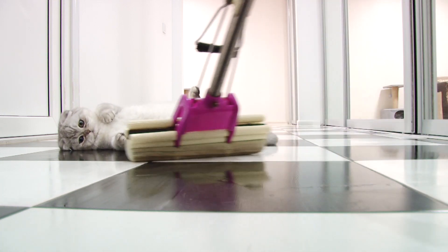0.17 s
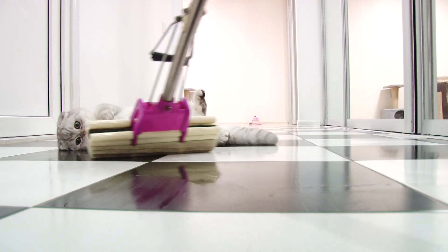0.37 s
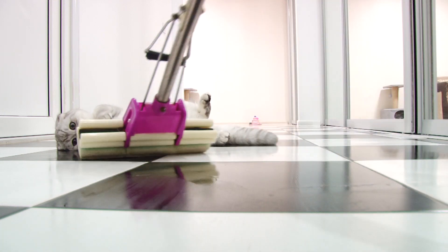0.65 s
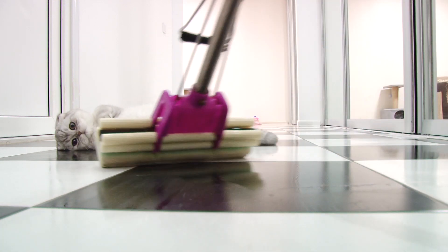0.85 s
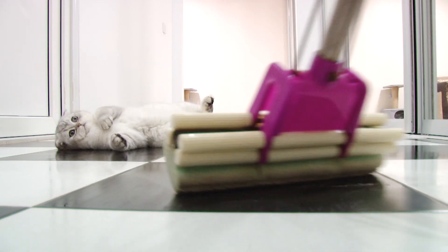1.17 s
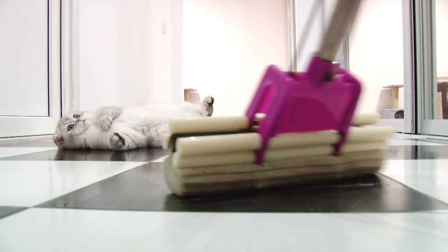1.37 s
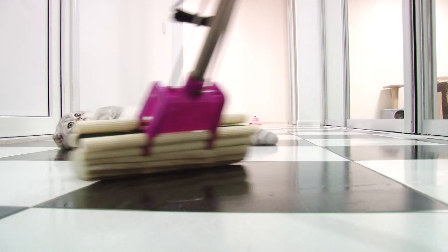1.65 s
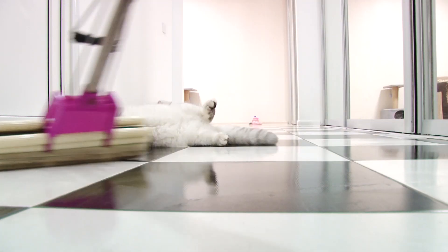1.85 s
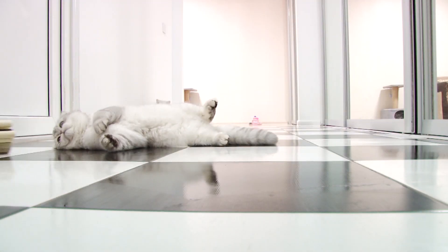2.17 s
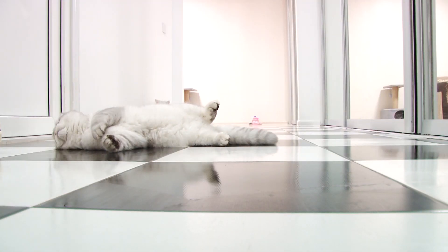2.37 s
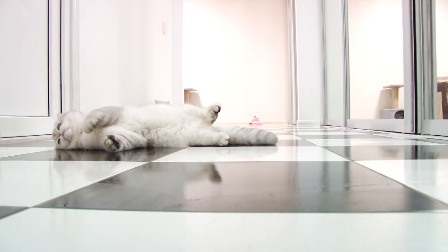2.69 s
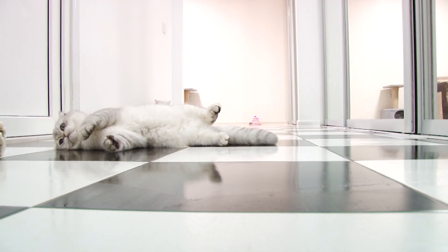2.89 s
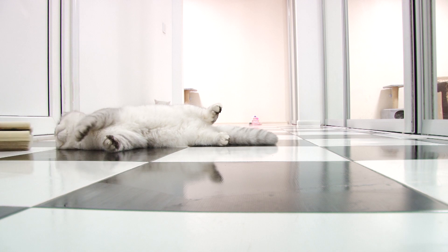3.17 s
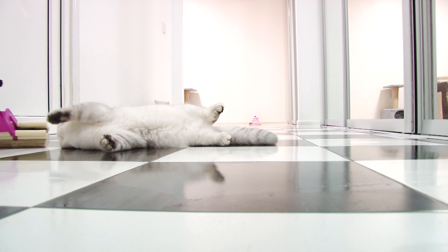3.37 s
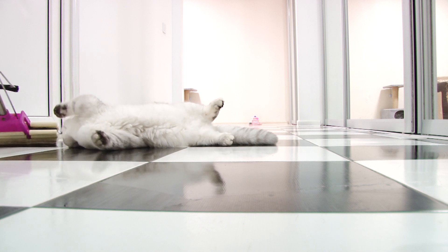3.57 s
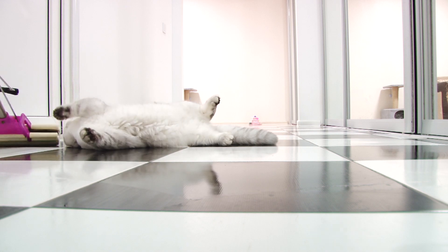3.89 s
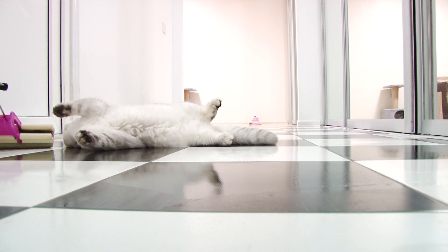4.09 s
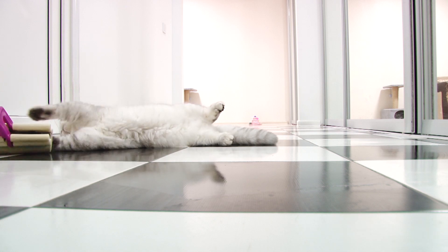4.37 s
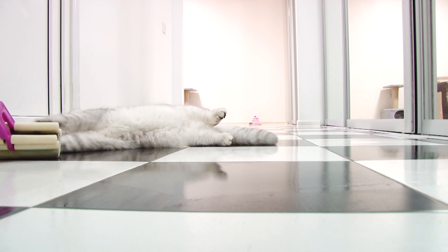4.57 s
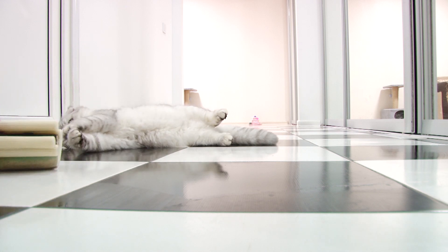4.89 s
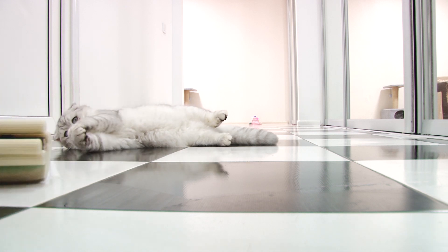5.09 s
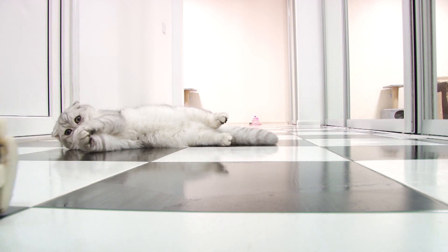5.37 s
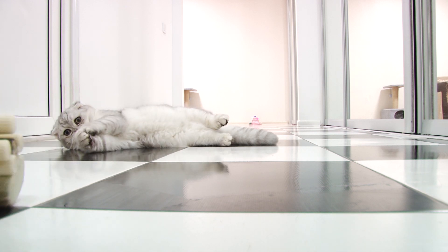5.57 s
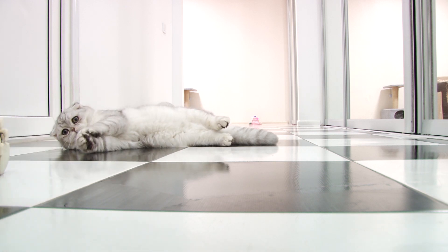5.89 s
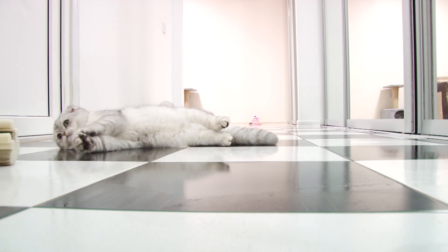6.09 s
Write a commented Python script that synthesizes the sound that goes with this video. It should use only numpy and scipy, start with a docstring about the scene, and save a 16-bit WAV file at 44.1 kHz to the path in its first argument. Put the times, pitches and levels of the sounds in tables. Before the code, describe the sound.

A low, close microphone catches a sponge mop pushed over tile. Fine wet hissing dips briefly before most clacks of the hinged plastic head, which catches, slams, rattles and rebounds with a short bright room echo. Between strokes come little clicks, soft scuffs and a barely audible rubbery groan; near the end the sponge peels with crisp ticks. A quiet hum and low rumble continue throughout.

```python
"""A wet sponge mop is pushed back and forth over a tiled floor, close by in a hard-walled room.
The damp sponge is coloured noise that fizzes as it slides and briefly goes quiet and dull now and then.
After most of these dips the loose plastic head catches, slams over, rattles and rebounds: modes plus noise.
One stroke adds a resonant swish; sponge and hinge tick and peel, and rubber groans in faint low tones.
Feet scuff softly in noise bands, and an appliance hums on a few sines over a low rumble."""
import sys
import numpy as np
from scipy import signal
from scipy.fft import rfft, irfft, next_fast_len
from scipy.io import wavfile

SR = 44100
rng = np.random.default_rng(int(sys.argv[2]) if len(sys.argv) > 2 else 0)


def put_to_file(sound):
    """Save the sound as 16-bit audio at rate SR, in the file named by the first command-line argument."""
    columns = np.atleast_2d(sound).T  # one column per channel
    safe = np.clip(columns, -1, 1)
    whole_steps = np.round(safe * 32767)
    wavfile.write(sys.argv[1], SR, whole_steps.astype(np.int16))


N = 275095
TIME = np.arange(N) / SR
TOP_HZ = 15800  # upper limit of the sound

# crack of hard plastic, shared by head and ticks: (f/Hz, level/dB)
CRACK_COLOUR = [(200, -9), (1000, -22), (2000, 1.5), (2800, 10.5), (3600, 0.5), (4300, 5), (5200, -1),
                (6700, 2), (7700, -3.5), (8500, -2.5), (10000, -16), (15500, -40)]


def sponge(grain_db=4.0, pivot_hz=5000, flicker_db=1.5, judder_db=0.72):
    """Countless wet pores let go of the tile; the fizz briefly goes quiet and dull, mostly before a clack."""
    # the slide, as hard as the sponge is pressed: (t/s, level/dB, brightness/dB per octave)
    slide = [(0, -43.5, -1.5), (.18, -41.5, -1.5), (.3, -45.5, -1), (.85, -45, -0.5), (1.1, -44, -2),
             (1.55, -42.5, -4.5), (1.85, -46, 0), (2.1, -47, -0.5), (2.32, -43, 0), (2.8, -45.5, -2),
             (3.3, -47.5, -1.5), (3.75, -45.5, -2.5), (4.2, -48.5, -3), (4.65, -44.5, 0.5),
             (5, -46.5, -1.5), (5.3, -43.5, -0.5), (5.8, -44.5, -2), (6.24, -42, 0.5)]
    # hiss of sponge on tile: (f/Hz, level/dB)
    hiss = [(300, -9.5), (1200, -7), (1800, -6.5), (2400, -1), (3100, -0.5), (3600, -7), (4300, 0.5),
            (5100, -4), (6400, 1.5), (7700, -2), (8500, -2), (9600, -6.5), (12500, -11.5), (15500, -25.5)]
    # short quiet dips of the fizz: (t/s, depth/dB, half width/s)
    dips = [(.61, 7, 0.067), (1.398, 8, 0.032), (2.52, 11.5, 0.12), (2.89, 9, 0.037), (3.85, 4, 0.069),
            (5.572, 7.5, 0.038)]
    dulling = .3  # dB per octave lost per dB of dip
    steepness = 1.9  # squareness of the dip
    s, *columns = np.transpose(slide)
    db, bright = (np.interp(TIME, s, c) for c in columns)
    dip = sum(depth * np.exp(-np.abs((TIME - at) / width) ** steepness) for at, depth, width in dips)
    db = db - dip
    bright = bright - dulling * dip
    fizz = unit(colour(grains(grain_db), hiss))
    out = np.zeros(N)
    for hz, band in bands(fizz):
        octaves = np.clip(np.log2(hz / pivot_hz), -2, 2)
        out += band * undb(bright * octaves + flicker_db * walk(25))
    return out * undb(db + judder_db * walk(40))


def swish(grain_db=4, judder_db=1.5):
    """Water and air are squeezed out under the flat sponge in a dense fizz with a few sharp resonances."""
    # resonances of the swish: (f/Hz, width/Hz, level/dB)
    peaks = [(4210, 640, 5), (5600, 770, 3), (6180, 590, 3), (7200, 1200, 5), (8500, 640, 0.5),
             (10330, 1800, 0), (14000, 4000, -18)]
    start_s, end_s, attack_s, release_s = 0.95, 1.387, .006, 0.033
    steady_db, bite_db, ease_s = -40, 8, 0.1  # it bites, then eases off to a steady push
    fizz = np.zeros(N)
    for hz, width, db in peaks:
        fizz += undb(db) * band_pass(grains(grain_db), [hz - width / 2, hz + width / 2])
    pressed = np.clip(np.minimum((TIME - start_s) / attack_s, (end_s - TIME) / release_s), 0, 1)
    bite = np.exp(-((TIME - start_s) / ease_s) ** 2)
    return unit(fizz) * pressed * undb(steady_db + bite_db * bite + judder_db * walk(89.2))


def knocks(count=5):
    """The hinge catches, the head slams, rattles count times, rebounds and drops; returns direct and room send."""
    # one clack of the mop head per row: (main blow t/s, level/dB, hard edge/dB, near end f/Hz, far end f/Hz,
    #   floor thud/dB, room send/dB, catches before it, their lead/s, first catch/dB, rattle/dB,
    #   rebound after/s, rebound/dB, drop back after/s, drop/dB); edge and room send are relative to the blow
    clack_rows = [(.659, -26.5, -32, 967, 1525, -50, -3.5, 1, 0.0047, -25, -34, .0145, -24.5, 0.035, -32),
                  (1.4396, -13.5, 0.5, 617, 1030, -26, -6.5, 2, 0.012, -34.5, -24.5, .0217, -25.5, .0717, -21),
                  (2.936, -13, -2.5, 1727, 599, -49, -3.5, 2, .0153, -30.5, -26, .0372, -28.5, .076, -23.5),
                  (3.903, -35.5, -15, 610, 1820, -50, 2, 1, 0.0038, -24.5, -39.5, .021, -38.5, 0.047, -53),
                  (5.617, -13.5, -1, 1338, 477, -40, -7, 3, .019, -27.5, -25, .0255, -26.5, 0.082, -31)]
    thump_db = 2
    # the far end of the head lands just after the near end
    rock_s, rock_db, rock_thump_db = .0018, -0.5, -3
    # catches crowd together and move towards the level of the blow, in thin clicks
    catch_hz, catch_crowding, catch_growth, catch_edge_db, catch_thump_db = 1294, 1.45, 1, 1, -24.5
    # a different loose part is struck at each rattle
    rattle_hz, rattle_spread_octaves, rattle_gap_s, rattle_jitter = 1486, 0.373, .0075, .25
    rattle_fall_db_per_s, rattle_edge_db, rattle_thump_db = 98, -11, -3.5
    rebound_hz, rebound_edge_db, rebound_thump_db = 648, 6.5, 1.5
    # the head drops back onto its sponge
    drop_hz, drop_edge_db, drop_thump_db = 980, -16, -0.5

    direct, sent = np.zeros(N), np.zeros(N)
    for (s, db, edge_db, near_hz, far_hz, floor_db, room_db, catches, lead, catch_db, rattle_db,
         rebound, rebound_db, drop, drop_db) in clack_rows:
        clack = np.zeros(N)
        for ahead in np.linspace(1, 0, round(catches), endpoint=False) ** catch_crowding:
            level = db + (catch_db - db) * ahead ** catch_growth
            add(clack, s - lead * ahead, contact(level, catch_thump_db, catch_hz, edge_db + catch_edge_db))
        add(clack, s, contact(db, thump_db, near_hz, edge_db))
        add(clack, s, undb(floor_db) * thud())
        add(clack, s + rock_s, contact(db + rock_db, rock_thump_db, far_hz, edge_db))
        for k, (late, part) in enumerate(rng.standard_normal((count, 2)), 1):
            after = rattle_gap_s * (k + rattle_jitter * late)
            hz = rattle_hz * 2 ** (rattle_spread_octaves * part)
            level = rattle_db - rattle_fall_db_per_s * after
            add(clack, s + after, contact(level, rattle_thump_db, hz, edge_db + rattle_edge_db))
        add(clack, s + rebound,
            contact(rebound_db, rebound_thump_db, rebound_hz, edge_db + rebound_edge_db))
        add(clack, s + drop, contact(drop_db, drop_thump_db, drop_hz, edge_db + drop_edge_db))
        direct += clack
        sent += undb(room_db) * clack
    return direct, sent


def contact(db, thump_db, thump_hz, edge_db, crack_t60=0.012, rattle_db=-18, rattle_t60=0.075,
            thump_t60=0.04, clatter_db=-6.0, clatter_t60=0.038, clatter_hz=(520, 2000), detune=0.0067,
            scatter_db=1.6, head_cut_hz=230, focus_db=8, focus_width=0.017):
    """One contact thumps the struck part, rings the head and cracks the plastic."""
    # what head and handle ring with: (f/Hz, t60/s, energy/dB)
    head_modes = [(246, 0.03, -18), (400, 0.099, -8.5), (483.4, 0.062, -3), (655, 0.023, -3),
                  (730, 0.013, -51), (910, 0.016, -40), (1186, 0.088, -4), (1329.5, 0.055, 3),
                  (1500, 0.019, -3), (1569, 0.065, 3.5), (1720, 0.01, 1), (1772, 0.017, 4.5),
                  (1968, 0.043, -13), (2290, 0.021, -4.5), (2604, 0.021, -4.5), (2940, 0.09, -10),
                  (3031, 0.043, -5), (1774, 0.57, -13.5), (1670, .4, -7)]
    t = np.arange(SR // 2) / SR
    hz, t60, mode_db = np.transpose(head_modes)
    # every contact lands on another spot, so the modes differ in pitch, strength and sign
    pitch, strength, side = rng.standard_normal((3, len(hz)))
    # modes close to the pitch of the struck part take up more of the blow
    near = np.exp(-(np.log(hz / thump_hz) / focus_width) ** 2)
    gain = np.sign(side) * undb(mode_db + scatter_db * strength + focus_db * near) / np.sqrt(t60)
    mode_hz = hz * (1 + detune * pitch)
    ring = gain @ (np.sin(2 * np.pi * mode_hz[:, None] * t) * fade(t, t60[:, None]))
    # the part that is struck gives a short damped thump of its own
    thump = low_cut(np.sin(2 * np.pi * thump_hz * t) * fade(t, thump_t60), thump_hz / 2)
    # rollers and rods add a crowd of modes too dense to tell apart
    clatter = band_pass(rng.standard_normal(len(t)), clatter_hz) * fade(t, clatter_t60)
    # the crack is over at once; loose parts buzz on a little
    crack_fade = fade(t, crack_t60) + undb(rattle_db) * fade(t, rattle_t60)
    crack = colour(rng.standard_normal(len(t)) * crack_fade, CRACK_COLOUR)
    blow = burst(ring) + undb(thump_db) * burst(thump)
    blow += undb(clatter_db) * burst(clatter) + undb(edge_db) * burst(crack)
    return low_cut(undb(db) * blow, head_cut_hz)


def thud(hz=238, t60=0.055):
    """The floor gives a low, quickly damped note under the blow."""
    t = np.arange(SR // 4) / SR
    return burst(low_cut(np.sin(2 * np.pi * hz * t) * fade(t, t60), hz / 2))


def ticks(snap_db=-8, snap_t60=0.005, crackle_db=-20, crackle_t60=0.17, crackle_hz=(1600, 3600)):
    """Tiny pops of a few cycles, each with a snap at its start and a short crackle after it."""
    # the clearest ticks of sponge and hinge: (t/s, peak level/dB, f/Hz)
    tick_rows = [(1.007, -23.5, 2400), (2.6125, -24, 1280), (2.7454, -16, 5240), (3.944, -17.5, 5570),
                 (4.59, -17.5, 3220), (5.006, -26.5, 2300), (5.061, -26, 3060), (5.085, -23, 2980),
                 (5.1254, -11.5, 2550), (5.162, -25, 3300), (5.216, -24, 3000), (5.23, -27, 5400),
                 (5.2361, -14.5, 2420), (5.251, -20.5, 2720), (5.331, -23.5, 3220), (5.375, -12, 4660),
                 (5.394, -23, 5260), (5.401, -14.5, 2460), (6.1244, -21.5, 2330), (6.1839, -15, 3170)]
    decay_cycles = 14.2  # a pop falls by 60 dB within this many cycles
    out, t = np.zeros(N), np.arange(SR // 10) / SR
    for s, db, hz in tick_rows:
        snap = colour(rng.standard_normal(len(t)) * fade(t, snap_t60), CRACK_COLOUR)
        # cubed noise is sparse and spiky
        crackle = band_pass(rng.standard_normal(len(t)) ** 3, crackle_hz) * fade(t, crackle_t60)
        # the pop swells over half a cycle
        pop = np.sin(2 * np.pi * hz * t) * np.minimum(2 * hz * t, 1) * fade(t, decay_cycles / hz)
        tick = low_cut(pop, hz / 2)
        tick += undb(snap_db) * snap / np.abs(snap).max()
        tick += undb(crackle_db) * crackle / np.abs(crackle).max()
        add(out, s, undb(db) * tick)
    return out


def peel(rate=160, size_db=6, band_hz=(1900, 4200)):
    """Single wet pores pop at random as the sponge peels off the tile, a few much louder than the rest."""
    peak_s, level_db, rise_db_per_s, fall_db_per_s = 5.06, -52, 203, 47  # a quick swell, then a steady fall
    sizes = undb(size_db * np.minimum(rng.exponential(size=N), 2))
    pores = (rng.random(N) < rate / SR) * sizes
    drop_db = np.maximum(rise_db_per_s * (peak_s - TIME), fall_db_per_s * (TIME - peak_s))
    return unit(band_pass(pores, band_hz)) * undb(level_db - drop_db)


def groan(waver=0.0063, rough_db=2):
    """Rubber sticks and slips briefly, holding a few low tones that waver in pitch and level."""
    # faint tones of rubbing rubber: (start/s, end/s, f/Hz, level/dB)
    groan_rows = [(2.645, 2.77, 125, -50), (2.62, 2.86, 500, -52), (2.75, 2.815, 265, -48)]
    out = np.zeros(N)
    for start, end, hz, db in groan_rows:
        cycles = np.cumsum(hz * (1 + waver * walk(34))) / SR
        tone = np.sqrt(2) * np.sin(2 * np.pi * cycles) * undb(db + rough_db * walk(37))
        length = max(int((end - start) * SR), 2)
        add(out, start, tone[:length] * signal.windows.tukey(length, .5))
    return out


def shuffles(width=0.65):
    """Rubbing feet and sponge give scuffs of band noise that swell and die away."""
    # soft scuffs of feet and sponge: (t/s, level/dB, f/Hz, length/s); each peaks at half its length
    scuff_rows = [(0.22, -37, 4480, 0.012), (1.189, -54, 230, 0.25), (1.361, -48, 218, 0.06),
                  (1.899, -55.5, 520, 0.26), (2.296, -49.5, 2480, 0.093), (2.536, -42.5, 790, 0.026),
                  (2.558, -49.5, 380, 0.083), (2.559, -47.5, 945, 0.16), (3.634, -46, 660, 0.042),
                  (3.68, -49.5, 192, 0.13), (4.32, -47, 2380, 0.047), (4.745, -48.5, 864, 0.047),
                  (5.072, -46, 136, 0.023), (5.172, -41, 1250, 0.027), (5.397, -36.5, 3520, 0.025)]
    out, t = np.zeros(N), np.arange(SR // 2) / SR
    for s, db, hz, length in scuff_rows:
        scuff = unit(band_pass(rng.standard_normal(len(t)), [hz / (1 + width), hz * (1 + width)]))
        swell = (2 * t / length) * np.exp(1 - 2 * t / length)
        add(out, s, undb(db) * scuff * swell)
    return out


def room(x, first_s=0.0083, early_db=2, early_t60=0.062):
    """Close walls answer first in a quick burst, then a diffuse tail decays at its own rate in each band."""
    # decay of the room: (f/Hz, t60/s)
    decay = [(150, 0.78), (600, 0.59), (1200, 0.71), (1800, 0.74), (3000, 0.68), (6000, 0.52),
             (12000, 0.57)]
    # colour of its echo: (f/Hz, level/dB)
    echo_colour = [(100, 6), (350, 1), (700, -1), (1300, -2.5), (1750, 0), (2300, -0.5), (3000, -3),
                   (3800, -4.5), (5000, 0), (7000, -3), (14000, -6)]
    t = np.arange(SR) / SR
    onset = np.clip(t / first_s - .5, 0, 1)
    early = undb(early_db) * fade(t, early_t60)
    tail = sum(band * (fade(t, lookup(decay, hz)) + early) for hz, band in bands(rng.standard_normal(SR)))
    tail = tail * onset
    tail = tail / np.sqrt(np.sum(tail ** 2))
    return signal.fftconvolve(x, colour(tail, echo_colour))[:N]


def background(air_db=-51.0, waver_db=1):
    """An appliance hums on a few wavering sines over a soft rumble of filtered noise."""
    # hum of the appliance: (f/Hz, level/dB)
    hum_rows = [(48.4, -56), (70.0, -60), (145.3, -63)]
    # still air of the room: (f/Hz, level/dB)
    air = [(20, -23), (60, 6.5), (100, 2.5), (150, 3), (200, -1), (280, 4), (400, -4), (600, -2.5),
           (900, -9.5), (2000, -10.5), (6000, -41.5), (15000, -35.5)]
    hum = np.zeros(N)
    for hz, db in hum_rows:
        level = np.sqrt(2) * undb(db + waver_db * walk(2.6))
        hum += level * np.sin(2 * np.pi * hz * TIME + 0.32 * walk(3.8))
    return hum + undb(air_db) * unit(colour(rng.standard_normal(N), air))


def undb(db):
    """Decibels to gain."""
    return 10 ** (np.asarray(db) / 20)


def unit(x):
    """Scale to rms 1."""
    return x / np.sqrt(np.mean(x ** 2))


def burst(x):
    """Scale to the energy of five milliseconds at rms 1."""
    return x * np.sqrt(.005 * SR / np.sum(x ** 2))


def fade(t, t60):
    """Exponential decay, 60 dB in t60."""
    return np.exp(-np.log(1000) * t / np.maximum(t60, 1e-4))


def grains(spread_db):
    """Noise whose samples also differ at random in level, for a grainier fizz."""
    return rng.standard_normal(N) * undb(spread_db * rng.standard_normal(N))


def walk(rate):
    """Slow chance with a spread near 1, heading for a new value rate times a second."""
    steps = rng.standard_normal(1024)
    return np.interp(TIME * rate, np.arange(len(steps)), steps)


def lookup(points, hz):
    """Read (f/Hz, value) points on a log-frequency axis."""
    f, value = np.transpose(points)
    return np.interp(np.log(np.maximum(hz, 1)), np.log(f), value)


def colour(x, points):
    """Causal filter with the gain of (f/Hz, level/dB) points, built from its cepstrum."""
    size = 4096
    gain = undb(lookup(points, np.fft.rfftfreq(size, 1 / SR)))
    cepstrum = irfft(np.log(gain))
    # folding the cepstrum forward in time gives minimum phase
    cepstrum[1:size // 2] *= 2
    cepstrum[size // 2 + 1:] = 0
    return signal.fftconvolve(x, irfft(np.exp(rfft(cepstrum))))[:len(x)]


def bands(x, count=18):
    """Split into overlapping bands that sum to the whole: (centre f/Hz, band)."""
    size = next_fast_len(len(x), real=True)
    spectrum, f = rfft(x, size), np.fft.rfftfreq(size, 1 / SR)
    centres = np.geomspace(50, TOP_HZ, count)
    for hz, share in zip(centres, np.eye(count)):
        yield hz, irfft(spectrum * lookup(np.c_[centres, share], f), size)[:len(x)]


def band_pass(x, edges_hz):
    """Keep what lies between two frequencies."""
    return signal.sosfilt(signal.butter(2, edges_hz, "band", fs=SR, output="sos"), x)


def low_cut(x, hz):
    """A small body radiates little below its size."""
    return signal.sosfilt(signal.butter(3, hz, "high", fs=SR, output="sos"), x)


def add(track, s, sound):
    """Mix a sound into a track at time s."""
    i = int(s * SR)
    track[i:i + len(sound)] += sound[:max(N - i, 0)]


def scene(tick_room_db=-9, shuffle_room_db=-6):
    """Mop and feet, the echo of clacks, ticks and scuffs, and the background."""
    clacks, sent = knocks()
    pops, feet = ticks(), shuffles()
    echo = room(sent + undb(tick_room_db) * pops + undb(shuffle_room_db) * feet)
    mop = sponge() + swish() + clacks + pops + peel() + groan()
    return (mop + feet + echo + background())[None]


def record(dry):
    """Soft saturation rounds the loudest peaks, and a steep low-pass cuts the top."""
    rounded = 1.1 * np.tanh(dry / 1.1)
    return signal.sosfilt(signal.ellip(8, .2, 70, TOP_HZ, fs=SR, output="sos"), rounded)


dry = scene()
out = record(dry)
put_to_file(out)
```